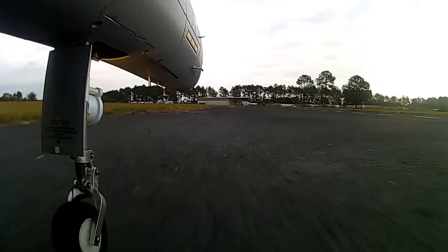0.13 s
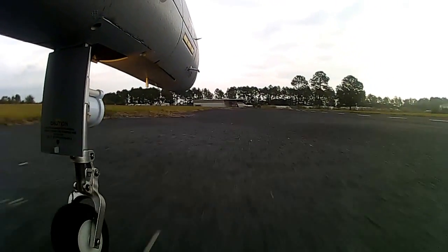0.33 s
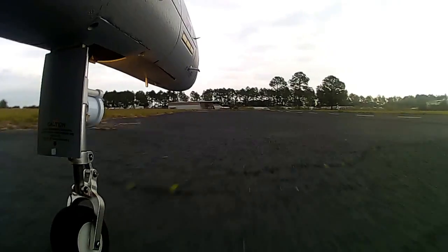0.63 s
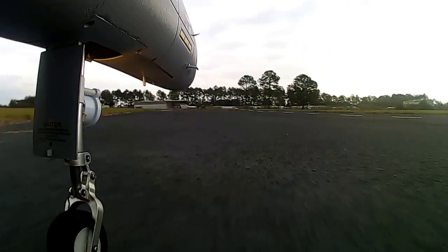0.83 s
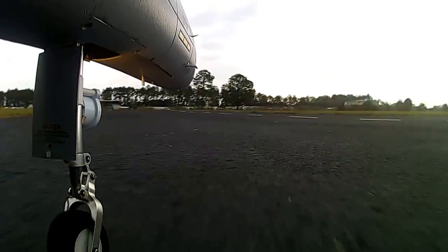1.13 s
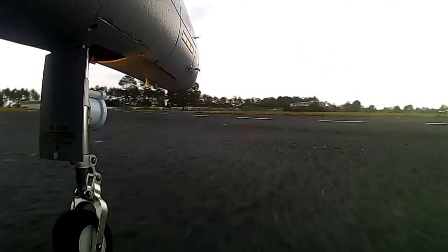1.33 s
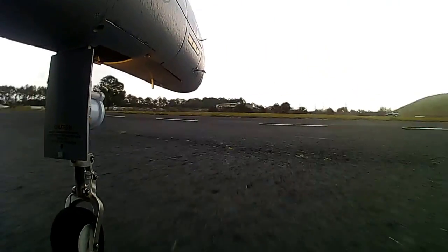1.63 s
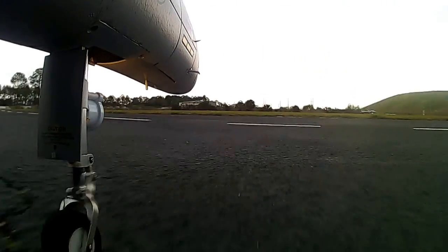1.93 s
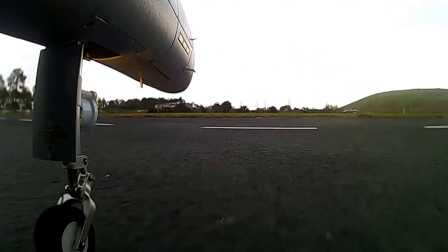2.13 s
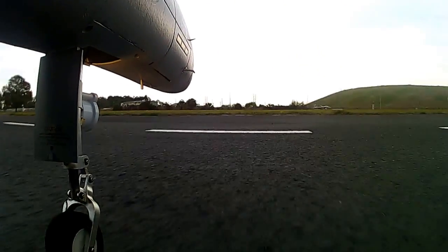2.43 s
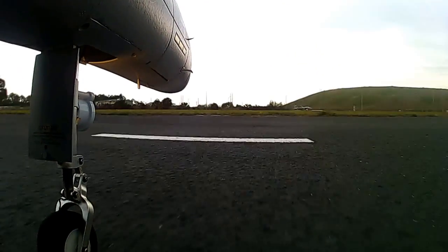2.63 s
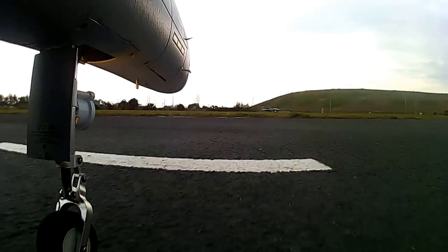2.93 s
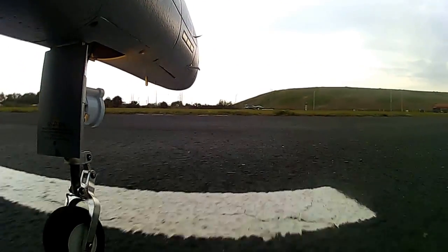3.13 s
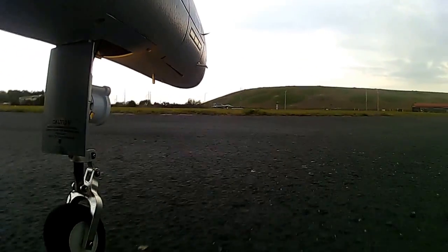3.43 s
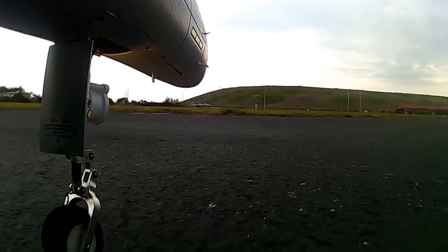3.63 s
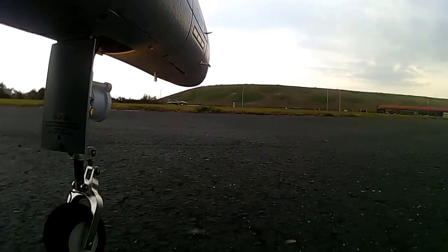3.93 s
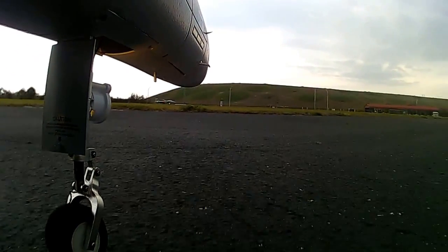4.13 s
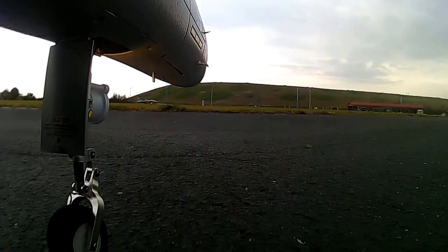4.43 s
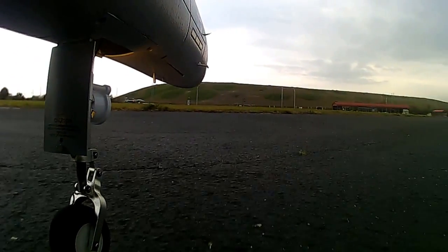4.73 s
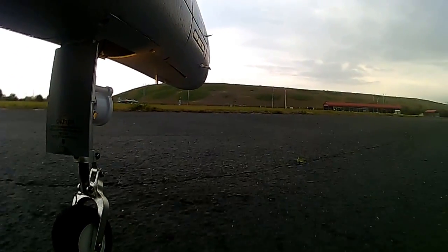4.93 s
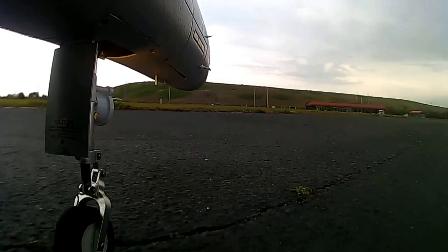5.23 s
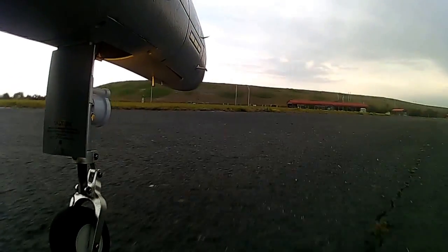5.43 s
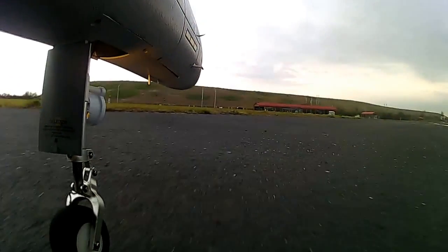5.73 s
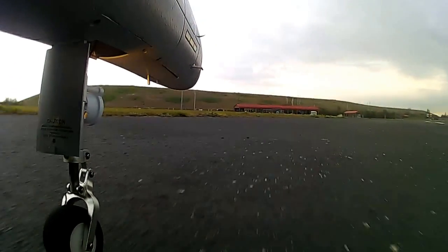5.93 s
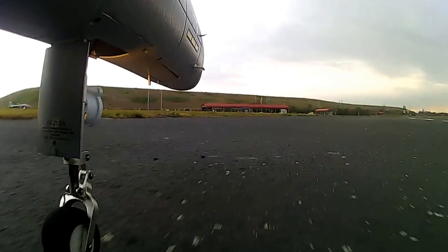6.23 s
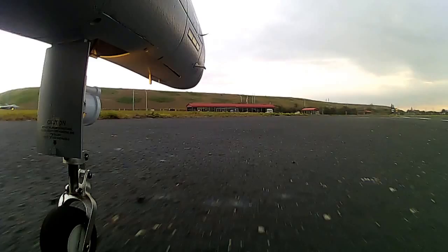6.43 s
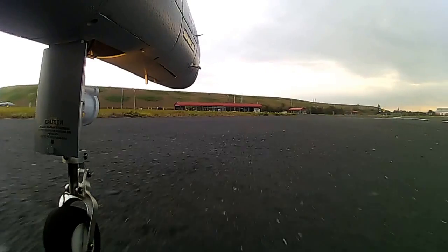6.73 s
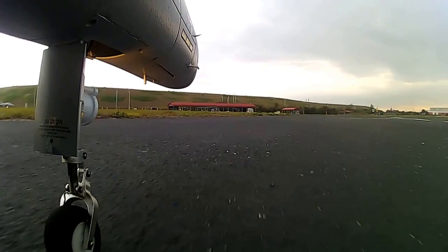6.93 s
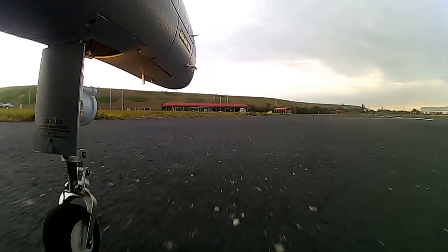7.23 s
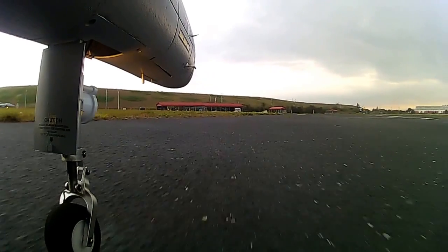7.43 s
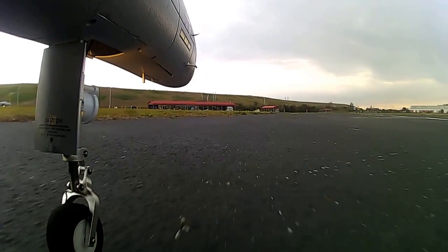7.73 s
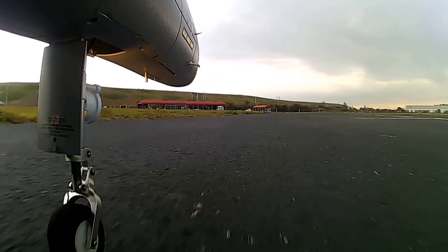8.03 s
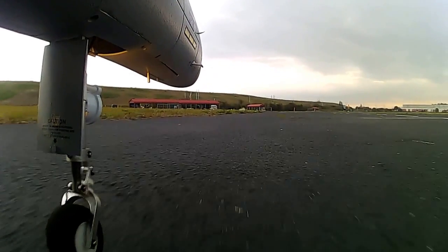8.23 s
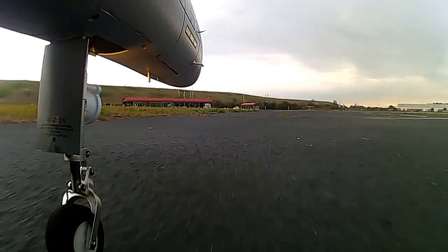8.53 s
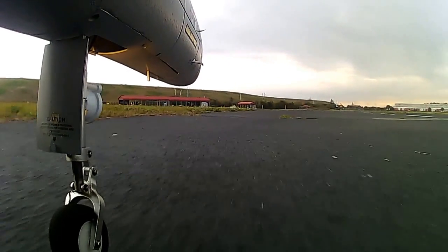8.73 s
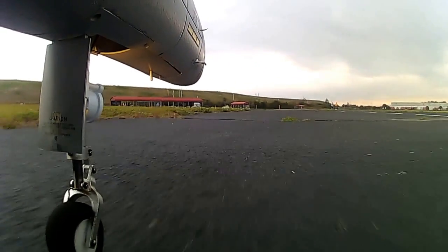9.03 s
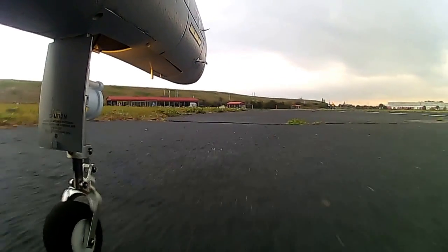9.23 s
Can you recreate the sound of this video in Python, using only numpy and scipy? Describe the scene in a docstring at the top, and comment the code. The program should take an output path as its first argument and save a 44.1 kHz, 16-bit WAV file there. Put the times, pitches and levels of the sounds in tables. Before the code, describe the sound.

A model jet coasts along an asphalt runway, heard from close under its belly. For the first two seconds its tyres rumble and crackle, with small knocks, light metallic ticks and some low wind on the microphone. At about 2.6 seconds the landing gear hits one hard, clattering bump, and the rolling fades almost to nothing. Around 4.2 seconds the electric fans start with short chirps and spool up in steps. A high whine and a shrill, fluttering whistle sit over rushing air, peaking near 6 seconds with slight distortion. At about 6.4 seconds the fans ease off, dropping in pitch and level. They run up again from 7 seconds and hold a loud, steady whistling whine from about 7.8 seconds until the end, just after 9 seconds. Underneath, the wheel rumble returns and wind buffeting grows as the jet gathers speed.

```python
"""The electric ducted fans of a model jet spool up, ease off briefly and run up again on a runway.
Two duct resonances whistle and beat over the blade-passing tone and the turbulent exhaust.
Before the fans start, the jet coasts, rattling over the asphalt and one hard bump.
A microphone under its belly is buffeted by the wind and overloads on the loudest beats."""
import sys
import numpy as np
from scipy.fft import rfft, irfft, next_fast_len
from scipy.io import wavfile
from scipy.ndimage import map_coordinates

SR = 44100
rng = np.random.default_rng(int(sys.argv[2]) if len(sys.argv) > 2 else 0)


def pcm_store(signal):
    """Save signal as 16-bit PCM."""
    levels = np.round(np.clip(np.atleast_2d(signal), -1, 1) * 32767)
    wavfile.write(sys.argv[1], SR, levels.astype(np.int16).T)


N = 413216

# fan speed, which drives the tones and the airflow: (time [s], blade-passing frequency [Hz])
FAN_SPEED = [(4.2, 716), (4.31, 1330), (4.42, 1794), (4.58, 2092), (5.06, 2092), (5.15, 2222), (5.24, 2486),
             (5.42, 2838), (5.75, 2846), (5.93, 3004), (6.12, 3032), (6.26, 3002), (6.45, 2306),
             (6.52, 1942), (6.6, 1776), (6.87, 1840), (7.14, 2037), (7.28, 2258), (7.65, 2284), (7.8, 2499),
             (9.36, 2484)]
FULL_SPEED_HZ = 3000


def amp(db):
    """Decibels as an amplitude ratio."""
    return 10 ** (np.asarray(db) / 20)


def unit(x):
    """Normalisation to rms 1."""
    return x / np.sqrt(np.mean(x ** 2) + 1e-20)


def curves(rows):
    """Linear interpolation: one value per sample for each column after the time."""
    times, *columns = np.transpose(rows)
    return [np.interp(np.arange(N) / SR, times, column) for column in columns]


def after(start_s, fade_s):
    """A gate that opens in a linear ramp."""
    return np.clip((np.arange(N) / SR - start_s) / fade_s, 0, 1)


def wobble(rate):
    """Random modulation: a smooth curve with rate knots a second."""
    knots = rng.standard_normal(int(N * rate / SR) + 4)
    return map_coordinates(knots, [np.arange(N) * rate / SR])


def filtered(x, response):
    """Linear filtering: the spectrum of x times a frequency response."""
    size = next_fast_len(N + 8192)
    return irfft(rfft(x, size) * response(np.fft.rfftfreq(size, 1 / SR)), size)[:N]


def coloured(x, spectrum):
    """Spectral shaping by rows of (frequency [Hz], level [dB]), at rms 1."""
    knots_hz, db = np.transpose(spectrum)
    return unit(filtered(x, lambda hz: amp(np.interp(np.log(hz + 1), np.log(knots_hz), db))))


def noise(spectrum):
    """Coloured Gaussian noise of rms 1."""
    return coloured(rng.standard_normal(N), spectrum)


def phase_of(hz):
    """Phase as the integral of frequency."""
    return 2 * np.pi * np.cumsum(hz) / SR


def tone(hz, jitter_hz, rough, width_hz):
    """Turbulence modulates a tone of rms 1: its pitch jitters and noise sidebands share its power."""
    phase = phase_of(hz + jitter_hz * wobble(45))
    skirt = lambda f: 1 / (1 + (f / width_hz) ** 2)
    in_phase, quadrature = [rough * unit(filtered(rng.standard_normal(N), skirt)) for _ in range(2)]
    return ((1 + in_phase) * np.sin(phase) + quadrature * np.cos(phase)) / np.sqrt(.5 + rough ** 2)


def by_speed(full_db, growth_db):
    """A power law: the gain is full_db at full fan speed and changes by growth_db per doubling."""
    return amp(full_db + growth_db * np.log2(curves(FAN_SPEED)[0] / FULL_SPEED_HZ))


def add(track, start_s, sound):
    """Superposition of a sound on a track."""
    part = track[round(start_s * SR):][:len(sound)]
    part += sound[:len(part)]


def wind_buffet():
    """Wind and shaking at the microphone make lumpy, low-frequency pressure fluctuations."""
    # strength of the buffeting: (time [s], relative level [dB])
    buffeting = [(0, -47.5), (.9, -48.5), (1.3, -44), (2.2, -50.5), (3.8, -56), (4.6, -60.5), (5.7, -53),
                 (5.95, -41), (7.8, -43), (9.36, -33.5)]
    # wind spectrum: (frequency [Hz], relative level [dB])
    wind_spectrum = [(15, -7.5), (30, 0), (55, 1.5), (80, 7.5), (130, 0.5), (200, -11.5), (400, -35.5)]
    db, = curves(buffeting)
    return amp(db + 1.5 + 2.2 * wobble(12)) * noise(wind_spectrum)


def rolling():
    """Roughness excitation: asphalt grit shakes the airframe and crackles under the tyres."""
    # rumble while coasting to a near stop, then gathering speed: (time [s], relative level [dB])
    coasting = [(0.0, -29), (0.35, -33), (0.77, -35), (1.36, -35), (1.84, -35), (2.16, -41), (2.6, -39),
                (2.74, -43.5), (4.12, -55)]
    run_up = [(4.3, -48), (5.2, -50), (7, -40.5), (7.3, -30), (9.36, -29)]
    # airframe and tyre responses: (frequency [Hz], relative level [dB])
    airframe_spectrum = [(50, -47), (120, -4.5), (185, 0), (245, -3.5), (300, 2), (380, -3), (440, -0.5),
                         (600, -6), (690, -3.5), (770, -11), (880, -10), (980, -17), (1400, -44)]
    tyre_spectrum = [(600, -32), (950, -2.5), (1200, 5.5), (1400, 4.5), (1600, 2.5), (1800, 6), (2300, 4.5),
                     (2700, -3.5), (3200, -7.5), (3650, 0), (4200, -13)]
    roll_db, = curves(list(coasting) + list(run_up))
    grit = wobble(70)
    rumble = amp(.5 + 1.64 * grit) * noise(airframe_spectrum)
    contacts = rng.standard_normal(N) * amp(2.0 * grit + 2.2 * wobble(500))
    crackle = amp(-8) * coloured(contacts, tyre_spectrum)
    return amp(roll_db + 1.4 * wobble(7.9)) * (rumble + crackle)


def gear_bumps(t, attack):
    """Impact excitation: each bump cracks and sets the damped modes of the landing gear ringing."""
    # blows on the gear: (time [s], relative level [dB], gain of the crack and modes above 1 kHz [dB])
    blows = [(.128, -18, -4), (0.246, -25, -6), (.542, -13, -4), (1.089, -31, -4), (1.608, -26, 1),
             (2.574, -13, -14), (2.583, -2.5, 0.5), (2.5917, -15, -9), (2.625, -15, -4),
             (2.653, -14.5, -0.5)]
    # strut and fuselage modes: (frequency [Hz], relative level [dB], 60 dB decay time [s])
    modes = [(99, -4.5, 0.039), (193, 6.5, 0.022), (310, -1.5, 0.037), (419, -6.5, 0.082),
             (673, -13.5, 0.059), (842, -14, 0.08), (1230, -14.5, 0.043), (1657, -8.5, 0.027),
             (2130, -13, 0.058), (2530, -16, 0.043)]
    out = np.zeros(N)
    for start_s, db, bright_db in blows:
        ring = np.zeros(len(t))
        for hz, mode_db, t60 in modes:
            decay = amp(mode_db + bright_db * (hz > 1000) + rng.normal(0, 1.8) - 60 * t / t60)
            ring += decay * np.sin(2 * np.pi * hz * rng.normal(1, 0.025) * t)
        crack = amp(bright_db - 13 - 60 * t / 0.022) * rng.standard_normal(len(t))
        add(out, start_s, amp(db - 3) * (ring + crack) * attack)
    return out


def wheel_ticks(t, attack):
    """Free vibration: loose metal in the nose wheel strikes, rings in one mode and bounces once."""
    # the clearest ticks: (time [s], relative level [dB])
    clear_ticks = [(.383, -24), (.446, -31), (.917, -28), (.939, -22), (1.342, -32.5), (1.457, -33),
                   (1.655, -28), (2.393, -39), (2.568, -40), (2.652, -39), (3.5, -44), (3.687, -50)]
    faint_ticks = [(s, -42.5) for s in rng.uniform(0, 1.9, size=9)]  # while the wheel runs fast
    envelope = attack * amp(-60 * t / 0.015)
    out = np.zeros(N)
    for start_s, db in clear_ticks + faint_ticks:
        ring_hz = rng.normal(3653, 44)
        contact = amp(-2) * rng.standard_normal(len(t))
        tick = amp(db + 10.5) * envelope * (np.sin(2 * np.pi * ring_hz * t) + contact)
        add(out, start_s, tick)
        add(out, start_s + rng.uniform(0.0045, 0.012), amp(-6) * tick)
    return out


def motor_starts(t):
    """Starting transients: the motors jerk into step with chirps roughened by phase noise."""
    # motor chirps: (time [s], level [dB], frequency [Hz], duration [s])
    chirps = [(4.15, -42, 1350, 0.024), (4.18, -48, 1300, 0.12), (4.301, -37, 1820, .025),
              (4.302, -41, 2720, 0.045), (4.313, -24, 489, 0.039), (4.33, -29, 930, 0.035)]
    out = np.zeros(N)
    for start_s, db, hz, duration_s in chirps:
        swell = np.sin(np.pi * np.minimum(t / duration_s, 1) ** 0.52) ** 2
        stutter = np.cumsum(rng.normal(0, 0.067, len(t)))
        add(out, start_s, amp(db) * swell * np.sin(2 * np.pi * hz * t + stutter))
    return out


def airflow():
    """Turbulence in the ducts radiates broadband noise that grows as a power of the fan speed."""
    # exhaust roar, intake rush, blade hiss and free jet: (frequency [Hz], relative level [dB])
    roar_spectrum = [(60, -49.5), (150, -27.5), (210, -14), (270, -14), (350, 0), (470, 0), (570, -5.5),
                     (660, -15), (740, -27), (1000, -75)]
    rush_spectrum = [(700, -46), (780, -17.5), (860, 3), (930, 1.5), (1080, -5), (1280, 1), (1550, -4.5),
                     (1820, 3), (2000, 0), (2300, 2.5), (2650, 1.5), (3000, -15.5), (3400, -42.5)]
    hiss_spectrum = [(2200, -32.5), (2800, 4.5), (3200, 3.5), (3550, 6.5), (3900, 10.5), (4300, -14.5),
                     (5000, -37)]
    jet_spectrum = [(120, -21.5), (220, -3.5), (300, 3.5), (500, -13), (750, -5), (870, -0.5),
                    (1100, -12.5), (1600, -26)]
    roar = by_speed(full_db=-18, growth_db=13) * amp(0.5 * wobble(14)) * noise(roar_spectrum)
    rush = by_speed(full_db=-19.5, growth_db=14) * amp(0.8 * wobble(20)) * noise(rush_spectrum)
    hiss = by_speed(full_db=-25.5, growth_db=16) * noise(hiss_spectrum)
    # the free jet fills the hollows between the duct resonances
    jet = by_speed(full_db=-22, growth_db=38) * noise(jet_spectrum)
    start_s = 4.28
    return after(start_s, fade_s=0.27) * roar + after(start_s, fade_s=0.092) * (rush + hiss + jet)


def fan_tones():
    """Rotor noise: a blade-passing tone, raspy at low speed, and shaft orders that emerge at high speed."""
    blades = 12
    blade_hz, = curves(FAN_SPEED)
    speed = blade_hz / FULL_SPEED_HZ
    blade_gain = by_speed(full_db=-25.5, growth_db=8) * amp(2.4 * wobble(11))
    blade_tone = blade_gain * tone(blade_hz, jitter_hz=8.02, rough=.18 / speed ** 2, width_hz=100)
    shaft_phase = phase_of((blade_hz + 14 * wobble(35)) / blades)
    hum = amp(-23 + 0.48 * wobble(25)) * np.sin(shaft_phase)
    buzz = amp(-33 + 3.4 * wobble(25)) * np.sin(blades / 2 * shaft_phase)
    return after(4.24, fade_s=.24) * (blade_tone + speed ** 8 * (hum + buzz))


def duct_whistle(hz, gain):
    """Flow-excited resonance: a duct sings one note, breathier when weakly blown."""
    breath = 0.22 + .62 / (1 + (gain / amp(-27)) ** 2)
    return gain * tone(hz, jitter_hz=7.74, rough=breath, width_hz=123)


def beating_whistles():
    """Interference: the whistles of the two ducts beat at their difference frequency."""
    # how strongly the ducts sing: (blade-passing frequency [Hz], relative level [dB])
    singing = [(1500, -55), (1800, -29.5), (2090, -16), (2280, -12), (2490, -8.5), (2680, -10.5),
               (2850, -9.5), (2930, -7.5)]
    # the whistles compete for the same air: (time [s], pitch gap [Hz], high one's amplitude share [0-1])
    rivalry = [(4.55, 71.52, .2), (5.25, 51.94, 0.18), (5.5, 67.76, .48), (5.81, 74.3, 0.54),
               (5.87, 76.1, 0.89), (6.12, 89.84, 1), (6.2, 88.1, 0.6), (6.3, 75.5, 1), (6.4, 54.88, 0.5),
               (7.05, 78, .3), (7.77, 55, 0.33), (7.88, 38.02, 0.5), (8.54, 36.08, 0.58),
               (8.62, 69.14, 0.6), (8.75, 67.55, 0), (8.87, 70.64, .5), (9.1, 81.04, 0.3),
               (9.36, 86.1, 0.37)]
    blade_hz, = curves(FAN_SPEED)
    gap_hz, high_share = curves(rivalry)
    low_hz = 2546 + .134 * (blade_hz - FULL_SPEED_HZ)  # the pitch rises a little with the airflow
    coupling_db = 0.0316 * (58.7 - gap_hz)  # the closer their pitches, the more they drive each other
    strength = amp(np.interp(blade_hz, *np.transpose(singing)) + coupling_db)
    low = duct_whistle(low_hz, strength * (1 - high_share))
    high = duct_whistle(low_hz + gap_hz, strength * high_share)
    return after(4.3, fade_s=0.056) * (low + high)


def scene():
    """Superposition of the sustained sources and the transients in one channel."""
    sustained = fan_tones() + beating_whistles() + airflow() + rolling() + wind_buffet()
    t = np.arange(SR // 5) / SR  # time within one transient [s]
    attack = 1 - np.exp(-t / 0.0024)
    transients = gear_bumps(t, attack) + wheel_ticks(t, attack) + motor_starts(t)
    return (sustained + transients)[None]


def record(dry):
    """Harmonic distortion: a band-limited microphone channel saturates, so loud beats spit treble."""
    mic_hz, top_hz = 4130, 15827
    ceiling, knee_sharpness = .715, 22
    narrow = filtered(dry[0], lambda hz: 1 / np.sqrt(1 + (hz / mic_hz) ** 110))
    clipped = narrow / (1 + np.abs(narrow / ceiling) ** knee_sharpness) ** (1 / knee_sharpness)
    return filtered(clipped, lambda hz: hz < top_hz)[None]


dry = scene()
out = record(dry)
pcm_store(out)
```